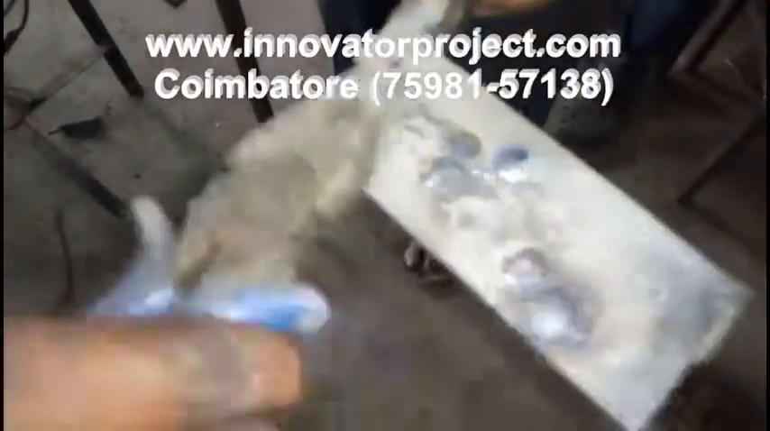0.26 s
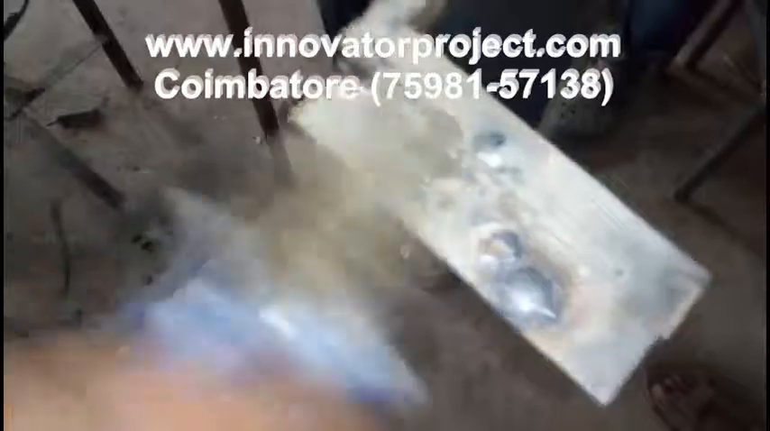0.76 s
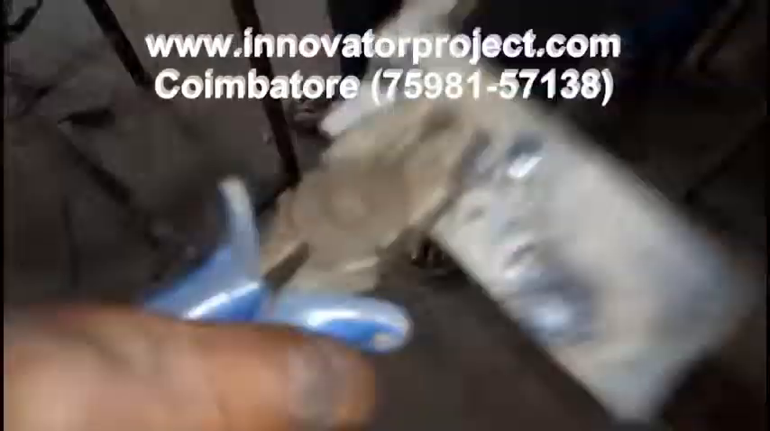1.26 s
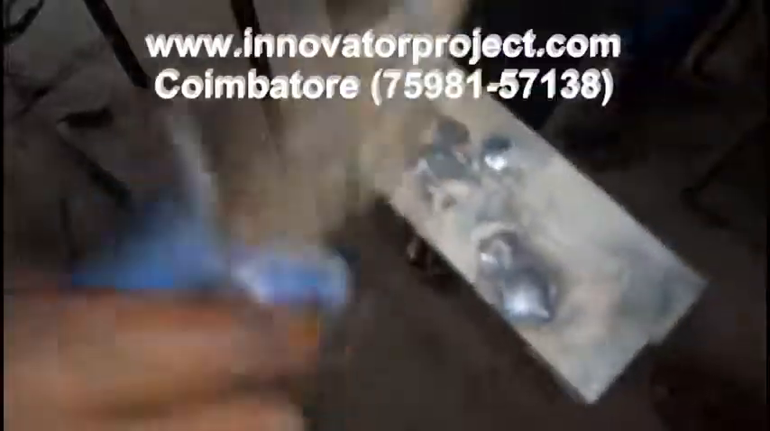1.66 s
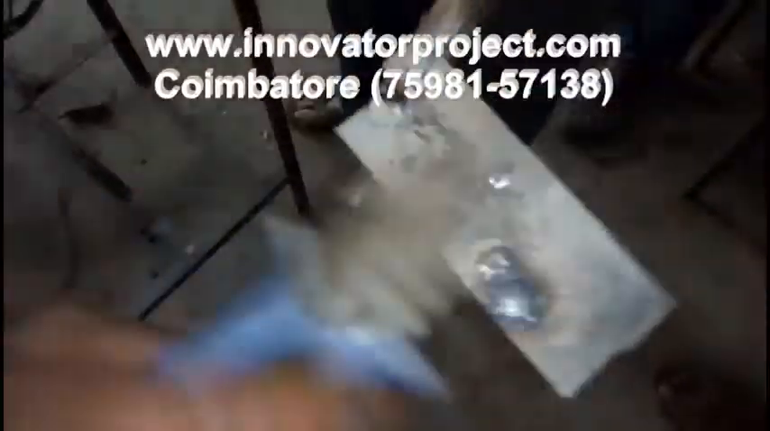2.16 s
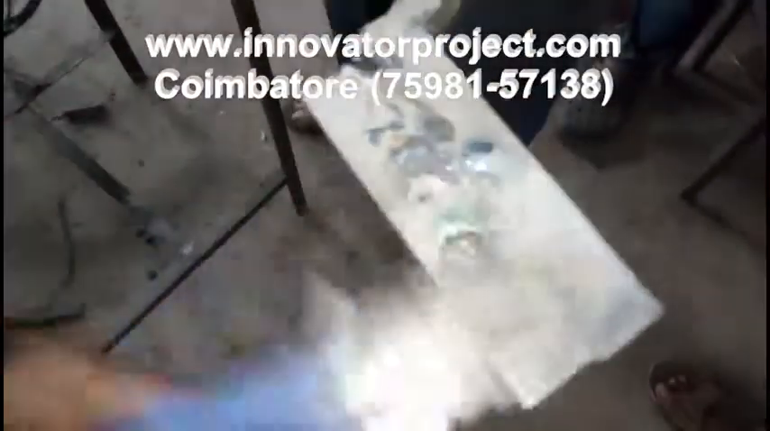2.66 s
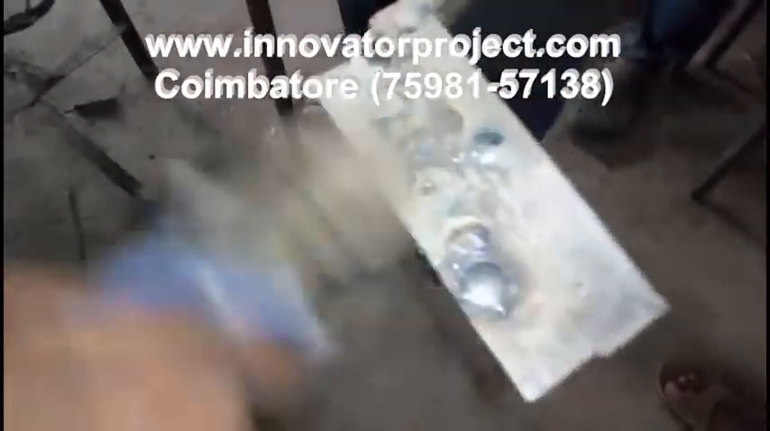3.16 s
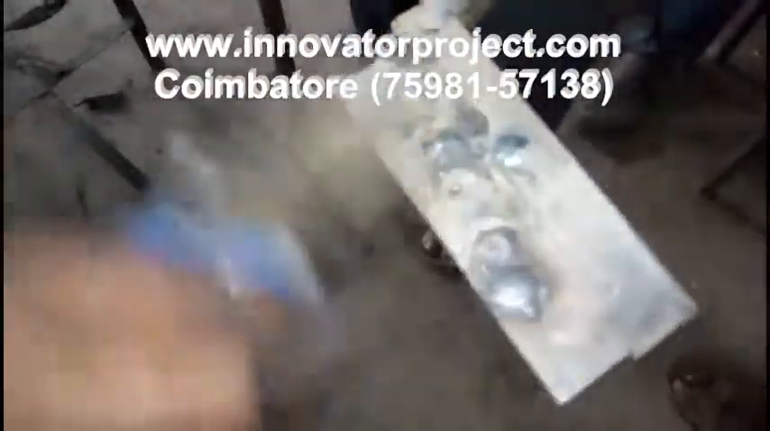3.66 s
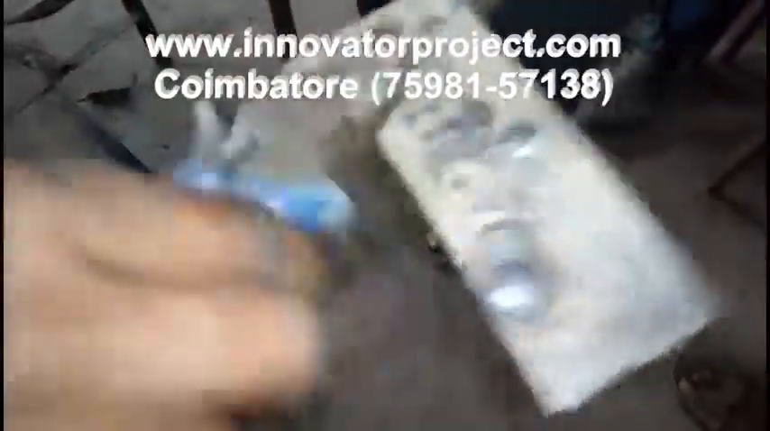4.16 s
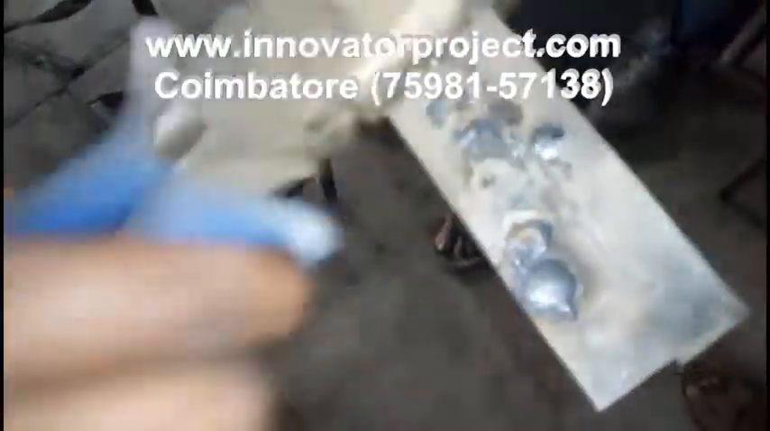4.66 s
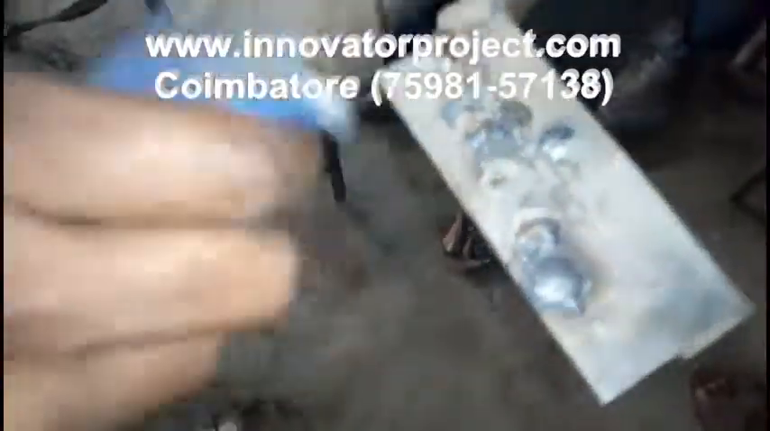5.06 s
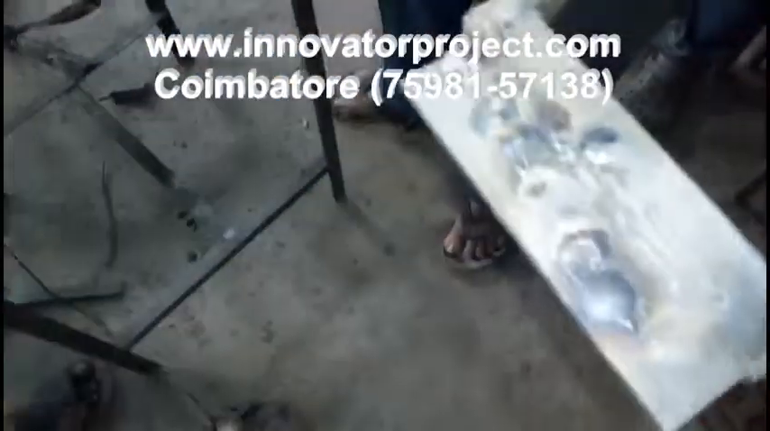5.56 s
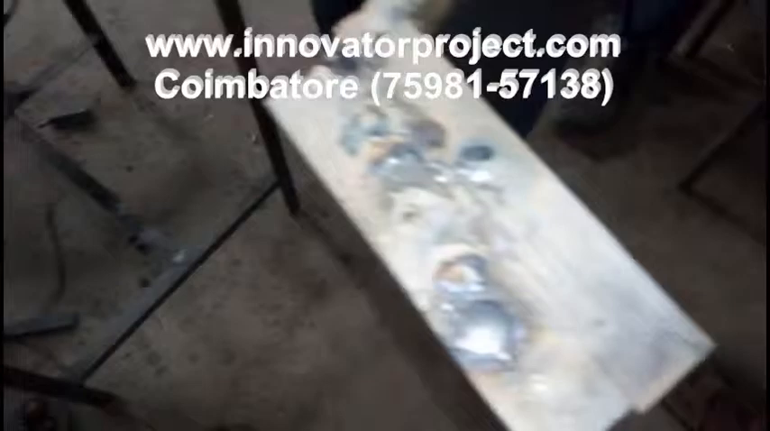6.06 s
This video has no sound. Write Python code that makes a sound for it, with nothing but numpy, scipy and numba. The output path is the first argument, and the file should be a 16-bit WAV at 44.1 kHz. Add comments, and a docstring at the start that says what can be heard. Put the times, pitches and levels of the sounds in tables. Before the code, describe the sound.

Sharp metallic knocks and brittle crackling taps on a steel plate, loud and overloaded, shed echo swelling after, then wind rumble and a squealing scrape.

```python
"""In a workshop shed, close to the left port of a phone, a hand-held steel tool chips slag off weld beads.
Far machines drone as filtered noise and tones; each contact is noise bursts and decaying steel modes.
Hard blows thud in the bench, overload the microphone and duck its gain, so the shed's echo swells up
after them. Air buffets the ports in two spells of bass noise; at the end steel scrapes and squeals."""
import sys
import numpy as np
from scipy import signal
from scipy.fft import rfft, irfft, next_fast_len
from scipy.io import wavfile
from scipy.ndimage import uniform_filter1d, map_coordinates
from numba import njit

SR = 44100
rng = np.random.default_rng(int(sys.argv[2]) if len(sys.argv) > 2 else 0)


def to_wav(s):
    """Save 16-bit WAV."""
    ch = np.atleast_2d(s).T  # columns
    pcm = np.round(np.clip(ch, -1, 1) * 32767)  # PCM
    wavfile.write(sys.argv[1], SR, pcm.astype(np.int16))


N = 278271


def amp(db):
    """Gain of a level in dB."""
    return 10 ** (np.asarray(db) / 20)


def unit(x):
    """Scale to rms 1."""
    return x / np.sqrt(np.mean(x ** 2) + 1e-20)


def along(points, hz):
    """Interpolate (frequency [Hz], value) points on a log frequency axis."""
    f, v = np.transpose(points)
    return np.interp(np.log(hz + 1), np.log(f + 1), v)


def wobble(rate):
    """A smooth random curve with rate knots a second."""
    knots = rng.standard_normal(int(N * rate / SR) + 4)
    return map_coordinates(knots, [np.arange(N) * rate / SR])


def filtered(x, response):
    """Multiply the spectrum of x by a complex response of frequency."""
    m = next_fast_len(N + SR // 2)
    return irfft(rfft(x, m) * response(np.fft.rfftfreq(m, 1 / SR)), m)[..., :N]


def causal(x, points, size=2048):
    """Minimum-phase filter through (frequency [Hz], gain [dB]) points."""
    gain = amp(along(points, np.fft.rfftfreq(size, 1 / SR)))
    cepstrum = irfft(np.log(gain + 1e-6))
    # fold the cepstrum onto positive time
    cepstrum[1:size // 2] *= 2
    cepstrum[size // 2 + 1:] = 0
    return signal.fftconvolve(x, irfft(np.exp(rfft(cepstrum))))[:N]


def resonance(f, hz, width, db):
    """Response of one damped resonance, width in Hz, db at its peak."""
    return amp(db) * 1j * f * width / (hz * hz - f * f + 1j * f * width)


def peaks(modes):
    """A flat response with (frequency [Hz], width [Hz], level [dB]) resonances added."""
    return lambda f: 1 + sum(resonance(f, *mode) for mode in modes)


def rush(spectrum, alike, patchy_db):
    """Stereo noise of rms 1, with patches of random gain and a set likeness between the ports."""
    z = signal.stft(rng.standard_normal((2, N)), nperseg=512)[2]
    field = uniform_filter1d(rng.standard_normal(z.shape[1:]), size=6, axis=0)
    field = uniform_filter1d(field, size=14, axis=1)
    pair = signal.istft(z * amp(patchy_db * unit(field)), nperseg=512)[1][:, :N]

    def mid_side(hz):
        # the share of mid and side sets the left-right correlation
        turn = np.arccos(np.clip(along(alike, hz), -1, 1)) / 2
        return amp(along(spectrum, hz)) * [np.cos(turn), np.sin(turn)]

    mid, side = filtered(pair, mid_side)
    return unit(np.array([mid + side, mid - side]))


# colour of the far drone: (frequency [Hz], relative level [dB per Hz])
DRONE_COLOUR = [(18, -69), (35, -4.5), (54, -10), (130, -4), (290, -6.5), (470, -5), (840, -6),
                (1230, -8.5), (2420, -7.5), (3630, -15.5), (10500, -18), (11600, -27.5), (12300, -66),
                (16200, -89), (22000, -120)]
# how alike the drone is at the two ports: (frequency [Hz], correlation [-1 to 1])
DRONE_LIKENESS = [(60, -0.88), (180, -0.99), (550, -0.74), (1650, 0.35), (4970, -0.31), (15000, 0.27)]
# balance of the drone: (frequency [Hz], left minus right [dB])
DRONE_BALANCE = [(60, 4.5), (180, -2.5), (550, -1.5), (1650, -8), (4970, -4), (15000, -5.5)]
# machine tones: (frequency [Hz], level before each port's gain [dB])
MACHINE_TONES = [(204.6, -53), (339, -51), (829, -51)]


def shop():
    """Far machines: a broad noise drone, opposite at the ports in the bass, and a few unsteady tones."""
    drone = rush(DRONE_COLOUR, DRONE_LIKENESS, patchy_db=1.0)
    drone = filtered(drone, lambda hz: amp(np.outer([.5, -.5], along(DRONE_BALANCE, hz))))
    t = np.arange(N) / SR
    hum = np.zeros(N)
    for hz, db in MACHINE_TONES:
        level = amp(db + 0.59 * wobble(3.6))
        hum += level * np.sin(2 * np.pi * hz * t + 1.3 * wobble(7.5))
    sway_db = .7 * wobble(2.0)
    return amp(-34.5 + sway_db) * drone + np.outer([1.5, -.7], hum)


# contacts: (time [s], blow strength [dB], then ring level [dB] of the low, high and side families)
CONTACTS = [(0.0334, 1.5, 3, -17, -19), (0.0709, -15.5, -9, -21, -32), (0.0858, -14.5, -30, -14, -36),
            (0.099, -21, -21, -31, -35), (0.1119, -18, -36, -24, -32), (0.1232, -26, -23, -25, -36),
            (0.132, -14.5, -16, -30, -33), (0.149, -2, -4, -30, -33), (0.2062, -25, -12.5, -15, -27),
            (0.3104, -12, -12, -5, -28), (0.324, -19, -21, -25, -33), (0.3432, -40, -28, -10, -26),
            (0.3524, -43, -23, -15, -15), (0.3647, -12, -17, -8, -25), (0.4775, -17, -15, -38, -34),
            (0.4867, -18, -5, -22, -33), (0.5155, 2.5, 4.5, -8, -19), (0.5583, -18.5, -36, -20, -34),
            (0.6166, -12, -28, -35, -37), (0.7056, -12, -4, -30, -35), (0.745, 1.5, -7, -6, -15),
            (0.774, -3, -29, -7, -24), (0.7835, -17, -27, -13, -30), (0.8074, -19, -24, -23, -21),
            (0.8185, -16, -33, -14, -14), (0.825, -13, -10, -30, -29), (0.844, -12.5, -4.5, -34, -33),
            (0.8734, -16, -16, -34, -40), (0.8994, -22, -10, -28, -30), (0.9171, -20, -13, -23, -26),
            (0.928, -12.5, -1.5, -20, -27), (0.9446, 2, -3, -19, -25), (0.9874, -2, -37, -10, -30),
            (1.0184, -24, -15, -35, -37), (1.0375, -19.5, -42, -30, -37), (1.3113, 6, 0, 9.5, 4),
            (1.534, 8.5, -4.5, -3, -19), (1.738, 10.5, 10, 15, 11), (1.9593, 9.5, 1.5, 13, 4),
            (2.1638, 6.5, -20, 5.5, -17), (2.358, 1.5, -2, -8.5, -23), (2.3907, -14.5, -13, -7.5, -30),
            (2.501, -20.5, -16, -27, -21), (2.5386, -17, -23, -23, -20), (2.5427, -12, -31, -30, -37),
            (2.5586, 3.5, 4, -3, 2.5), (2.5797, -11, -21, -31, -37), (2.5982, -14, -12, -31, -31),
            (2.643, -14.5, -8, -32, -33), (2.724, -10, -20, -22, -6), (2.7454, -13, -9, -28, -7),
            (2.7654, 4, 0, -26, -10), (2.793, 1, 4, -28, -4), (2.8899, -3, -1, -24, -8),
            (2.9158, -22, -20, -11.5, -10), (2.954, 0, -6, -15, -25), (2.9717, 3, -35, -12, -28),
            (3.0, -1, 2, -11, -5), (3.02, -13.5, -27, -35, -39), (3.0524, -22, -19, -34, -35),
            (3.1535, -17, -37, -13, -10), (3.167, -23, -31, -20, -14), (3.1797, -21, -20, -15, -0.5),
            (3.192, -12.5, -8, -22, -0.5), (3.2135, 4, -13, -28, -23), (3.2467, -16.5, -21, -5, -21),
            (3.2501, -10.5, -9.5, -19, -31), (3.4079, -6, -11, -10, -1), (3.4246, -3, -9, -23, -34),
            (3.439, 0.5, -1, -22, -18), (3.449, -15, -5, -27, -23), (3.4631, 4, -3, -5, -31),
            (3.4989, -9.5, -13, -18, -30), (3.6545, -5.5, -33, 2, -6), (3.6737, -3.5, -5, -16, -6),
            (3.7038, -3.5, -13, -25, -28), (3.711, -9, -1, -27, -28), (3.7385, -10.5, -10, -26, -32),
            (3.9117, 5.5, -17, 11.5, -11), (3.9342, 3, -13, -16, -27), (3.948, -14, -12, -24, -28),
            (3.9589, -5, -9, -4, -24), (3.9745, -1, 4, -27, -33), (4.1983, 4.5, 1, -30, -23),
            (4.553, -24, -35, -28, -32), (4.5589, 6, -6, 3, 8), (4.779, 8.5, -5, 11, 12),
            (4.992, 6, -25, -33, -19), (5.2095, 9, -3, -12, 1), (5.432, 5, -15, -26, -16),
            (5.4556, -14, -4.5, -31, -38)]


def blows(per_db, lead_s):
    """One impulse for every contact, lead_s early, its level in dB per_db times the strength."""
    s, db, *_ = np.transpose(CONTACTS)
    return np.bincount(np.round((s - lead_s) * SR).astype(int), amp(per_db * db), N)


# the thud grows fast with the blow and is weaker on the right
THUD_DB, THUD_PER_DB, THUD_LEAD_S, THUD_LEFT_DB = -12, 2.5, 0.00192, 17
PUSH_HZ = 304
BENCH_HZ, BENCH_WIDTH_HZ, BENCH_DB = 82, 14, 15
BODY_HZ, BODY_WIDTH_HZ, BODY_DB = 620, 1100, -5
SWAY_HZ, SWAY_WIDTH_HZ, SWAY_DB = 36, 35, 8


def thud():
    """The bench gives way under the blow, sways and hums briefly; the plate adds a dull body."""
    def bench(f):
        push = -1 / (1 + 1j * f / PUSH_HZ) ** 2
        hum = resonance(f, BENCH_HZ, BENCH_WIDTH_HZ, BENCH_DB)
        body = resonance(f, BODY_HZ, BODY_WIDTH_HZ, BODY_DB)
        sway = resonance(f, SWAY_HZ, SWAY_WIDTH_HZ, SWAY_DB)
        return push - hum + body - sway

    push = amp(THUD_DB) * filtered(blows(THUD_PER_DB, THUD_LEAD_S), bench)
    return np.outer(amp([0, -THUD_LEFT_DB]), push)


# modes of the tool in three families, low, high and side:
# (nominal frequency [Hz], relative level [dB], time to fall 60 dB [s])
TOOL_MODES = [
    [(3553, -5, 0.052), (1774, -22, 0.04), (6520, -17, 0.02), (8446, -16, 0.08)],
    [(10300, -2, 0.025), (10750, -4, 0.02)],
    [(9780, -3, 0.035), (8430, -15, 0.07)],
]
# colour of the breaking slag: (frequency [Hz], filter gain [dB])
CRACK_COLOUR = [(590, -42), (1000, -43), (2550, -17), (3610, -7), (6950, -7), (10300, -1), (11100, -2.5),
                (12000, -12), (13400, -14.5), (16300, -57)]
# colour of the dull knock: (frequency [Hz], filter gain [dB])
KNOCK_COLOUR = [(300, -72), (900, -8), (1450, 7), (2300, 9.5), (3200, 3.5), (5000, -42)]
# colour of the plate's clank: (frequency [Hz], filter gain [dB])
CLANK_COLOUR = [(3400, -30), (4300, 0), (5200, -2), (6200, -30)]
# the low ring shifts as the grip changes: (time [s], pitch shift [%])
GRIP_SHIFT = [(0, 1.5), (1.0, 1.5), (1.7, -1.0), (2.2, -0.6), (2.4, 0.01), (5.0, 0.01), (5.45, 0.8)]
KNOCK_DB, KNOCK_PER_DB, KNOCK_SCATTER_DB = -14, -0.49, 2  # relative to the blow
CLANK_DB, CLANK_PER_RING_DB, CLANK_T60_S = 14, .8, .011
STOP_DB = -5  # what a new contact takes from the ring still sounding


def chipping():
    """Each contact: a bright crack of slag, a dull knock, a clank of the plate and the ring of the tool."""
    t = np.arange(SR // 5) / SR
    crack, knock, clank = np.zeros((3, N + len(t)))
    ring = np.zeros((len(TOOL_MODES), N + len(t)))
    direct = np.ones(N + len(t))
    rise = 1 - np.exp(-t / 0.0002)
    shift_s, shift_percent = np.transpose(GRIP_SHIFT)
    for s, db, *ring_db in CONTACTS:
        start = round(s * SR)
        at = slice(start, start + len(t))
        ring[:, at] *= amp(STOP_DB)

        # a sharp snap, then the rattle of slag and plate, its tail gritty
        grit = amp(5 * np.repeat(rng.standard_normal(len(t) // 20), repeats=20))
        snap = amp(10.5 - 60 * t / 0.0015)
        rattle = amp(2 - 60 * t / 0.0073) + amp(-12.5 - 60 * t / 0.061) * grit
        crack[at] += amp(db) * rise * (snap + rattle) * rng.standard_normal(len(t))

        dull_db = KNOCK_DB + KNOCK_PER_DB * db + rng.normal(0, KNOCK_SCATTER_DB)
        knock[at] += amp(db + dull_db - 60 * t / 0.022) * rise * rng.standard_normal(len(t))

        # a blow that rings the tool little lands flat on the plate and clanks
        ring_excess_db = max(max(ring_db[1:]) - db + 13, 0)
        flat_db = CLANK_DB - CLANK_PER_RING_DB * ring_excess_db + .3 * min(db - 4, 0)
        clank[at] += amp(db + flat_db - 60 * t / CLANK_T60_S) * rise * rng.standard_normal(len(t))

        # hard blows set the whole plate going, which feeds the shed more than the phone
        direct[at] = amp(-.65 * max(db + 10.0, 0))

        # the spot struck decides how strongly each family rings
        tune = 1 + np.interp(s, shift_s, shift_percent) / 100
        for group, family in enumerate(TOOL_MODES):
            for nominal_hz, mode_db, t60 in family:
                hz = nominal_hz * (1 if group else tune) * (1 + 0.0026 * rng.standard_normal())
                level = mode_db + ring_db[group] + rng.normal(0, 1.5)
                # a random phase drift roughens each ring
                drift = .048 * np.cumsum(rng.standard_normal(len(t)))
                tone = np.sin(2 * np.pi * hz * t + drift)
                ring[group, at] += amp(level - 60 * t / t60) * rise * tone
    hits = amp(8.0) * causal(crack[:N], CRACK_COLOUR)
    hits = hits + amp(6.5) * causal(knock[:N], KNOCK_COLOUR)
    hits = hits + causal(clank[:N], CLANK_COLOUR)
    return hits, ring[:, :N], direct[:N]


# how long the shed rings: (frequency [Hz], time to fall 60 dB [s])
SHED_DECAY = [(1000, 1), (4000, 0.95), (10000, 0.72), (15000, 0.12)]
# what each port picks up of the echo: (frequency [Hz], gain [dB])
ECHO_AT_LEFT = [(1000, 1), (3000, -1), (4300, -6), (7000, -2.5), (10000, -11), (14000, -9)]
ECHO_AT_RIGHT = [(1000, 6), (3000, 2), (4300, -2.5), (7000, -2.5), (10000, -3.5), (14000, 7)]


def shed(x):
    """The echo: each frequency dies at its own speed, with a fresh coloured tail every quarter second."""
    out, step = np.zeros((2, N + SR)), SR // 4
    for start in range(0, N, step):
        hz, t, z = signal.stft(rng.standard_normal((2, SR // 2)), SR, nperseg=256)
        colour_db = 2.5 * unit(uniform_filter1d(rng.standard_normal(len(hz)), size=5))
        grow = (1 - np.exp(-t / 0.0038)) * amp(colour_db)[:, None]
        decay = amp(-60 * t / along(SHED_DECAY, hz)[:, None])
        tail = signal.istft(z * grow * decay, SR, nperseg=256)[1]
        tail = tail / np.linalg.norm(tail[0])
        wet = signal.fftconvolve(x[None, start:start + step], tail, axes=1)
        out[:, start:start + wet.shape[1]] += wet
    return filtered(out[:, :N], lambda hz: amp([along(ECHO_AT_LEFT, hz), along(ECHO_AT_RIGHT, hz)]))


# air on the ports, two spells: (time [s], level [dB], left minus right [dB])
AIR_SPELLS = [
    [(2.19, -62, 12), (2.24, -43.5, 12), (2.34, -46.5, 19), (2.45, -37.5, 2), (2.52, -61, 18),
     (2.63, -50, 7), (2.66, -44, 13), (2.72, -43.5, 16), (2.76, -53, 16)],
    [(5.84, -63, 19), (5.89, -31.5, 26), (5.94, -28, 4), (5.995, -42, -5), (6.02, -29, 17),
     (6.065, -25.5, 7), (6.09, -14, 5), (6.2, -24.5, 15), (6.31, -21.5, 3)],
]
# colour of the buffeting: (frequency [Hz], relative level [dB per Hz])
BUFFET_COLOUR = [(15, -58), (25, -40.5), (114, -7), (237, -21), (407, -28.5), (637, -37.5), (900, -58),
                 (1980, -120)]


def air():
    """Moving air buffets each port in its own lumps: bass noise under slow swells."""
    t, swell = np.arange(N) / SR, np.zeros((2, N))
    for s, db, pan_db in map(np.transpose, AIR_SPELLS):
        level_db = np.interp(t, s, db, left=-120, right=-120)
        swell += amp(level_db + np.outer([.5, -.5], np.interp(t, s, pan_db)))
    lumps = amp(3 * np.array([wobble(30), wobble(30)]))
    return swell * unit(lumps * rush(BUFFET_COLOUR, [(100, 0.013)], patchy_db=0.5))


# swell of the gritty drag: (time [s], level [dB])
SCRAPE_SWELL = [(6.12, -50), (6.148, -29.5), (6.196, -22.5), (6.201, -16.5), (6.25, -15.5), (6.31, -20.5)]
# colour of the grit: (frequency [Hz], relative level [dB per Hz])
RASP_COLOUR = [(1500, -12), (2700, -6), (3400, -1), (7000, -2), (10800, 1.5), (11800, -9), (16000, -48)]
# resonances of the dragged part: (frequency [Hz], width [Hz], level [dB])
DRAGGED_PART = [(4030, 34, 8), (5850, 28, 9), (6120, 42, 10), (6970, 99, 2)]
CHATTER_HZ, CHATTER_START_S, CHATTER_RATE = 3210, 6.2, 30.5  # rate in catches a second
CHATTER_DB, CHATTER_FADE_DB_PER_S = -14, 111


def scrape():
    """Steel drags over steel: grit lifted at the part's resonances, and a squeal that catches and lets go."""
    s, db = np.transpose(SCRAPE_SWELL)
    t = np.arange(N) / SR
    grit = rush(RASP_COLOUR, [(3000, 0.044)], patchy_db=1.5) * amp(1.9 * wobble(400))
    since = t - CHATTER_START_S
    catch = np.clip(2.3 * np.sin(2 * np.pi * CHATTER_RATE * since) + 1.4, .15, 1)
    catch = (since > 0) * catch
    fade = amp(CHATTER_DB - CHATTER_FADE_DB_PER_S * np.maximum(since, 0))
    squeal = catch * fade * np.sin(2 * np.pi * CHATTER_HZ * t + 0.77 * wobble(140))
    drag = amp(np.interp(t, s, db, left=-120)) * unit(filtered(grit, peaks(DRAGGED_PART)))
    return drag + np.outer([1, .6], squeal)


# the far port against the near one, before the smear: (frequency [Hz], gain [dB])
FAR_PORT = [(500, -7.5), (3500, -14.5), (9500, -17.5), (14000, -13)]
# the plate's broad ring, heard in the echo: (frequency [Hz], width [Hz], level [dB])
PLATE_RING = [(4390, 140, 7), (10150, 900, -3)]
# what each ring family, low, high and side, feeds the echo before its overall gain: (level [dB])
RING_TO_ECHO = [
    [-26],
    [-22],
    [-28],
]
LAG = 27  # samples to the far port
ECHO_DB, ECHO_PER_DB = 5.5, 1.75  # harder blows fill the shed more


def scene():
    """The blows reach the left port first and louder; the far port gets them smeared by hand and bench."""
    hits, ring, direct = chipping()
    near = direct * (hits + ring.sum(axis=0))
    t = np.arange(SR // 40) / SR
    smear = amp(-15 - 60 * t / 0.066) * rng.standard_normal(len(t))
    smear[0] = 1
    delayed = np.pad(near, (LAG, 0))[:N]
    far = signal.fftconvolve(causal(delayed, FAR_PORT), smear)[:N]
    struck = filtered(causal(blows(ECHO_PER_DB, 0), CRACK_COLOUR), peaks(PLATE_RING))
    echo = shed(struck + np.sum(amp(RING_TO_ECHO) * ring, axis=0))
    return np.array([near, far]) + amp(ECHO_DB) * echo + thud() + shop() + air() + scrape()


@njit
def ducking(over_db, fall, hold, recover):
    """Gain cut in dB: follows the excess fast, holds for some samples, then lets go."""
    cut, now, aim, wait = np.zeros(len(over_db)), 0.0, 0.0, 0.0
    for i in range(len(over_db)):
        if over_db[i] >= aim:
            aim, wait = over_db[i], hold
        elif wait > 0:
            wait -= 1
        else:
            aim = max(aim - recover, 0.0)
        now += fall * (aim - now)
        cut[i] = now
    return cut


UNDUCKED_HZ = 120  # the gain control leaves the bass below this alone
TOP_HZ = 16100  # upper edge of the microphone's band


def record(dry):
    """Microphone: gain control too slow for the first milliseconds, clipping and the band limit."""
    sensed = filtered(dry, lambda f: 1j * f / (1500 + 1j * f))  # the detector plays down the bass
    share = 1 / (0.002 * SR)
    power = signal.lfilter([share], [1, share - 1], np.max(sensed ** 2, axis=0))
    over_db = 4.64 * np.maximum(10 * np.log10(power + 1e-12) + 10, 0)
    late, fall = round(.003 * SR), 1 / (.004 * SR)
    cut_db = ducking(np.minimum(over_db, 19), fall, hold=0.006 * SR, recover=680 / SR)
    bass = filtered(dry, lambda f: 1 / (1 + (f / UNDUCKED_HZ) ** 4))
    ducked = bass + (dry - bass) * amp(-np.pad(cut_db, (late, 0))[:N])
    overloaded = ducked / (1 + np.abs(ducked) ** 6) ** (1 / 6)
    return np.clip(filtered(overloaded, lambda hz: 1 / (1 + (hz / TOP_HZ) ** 80)), -1, 1)


dry = scene()
out = record(dry)
to_wav(out)
```